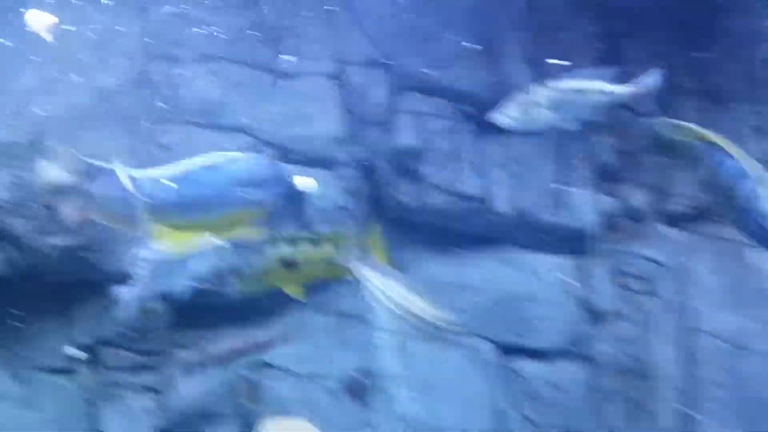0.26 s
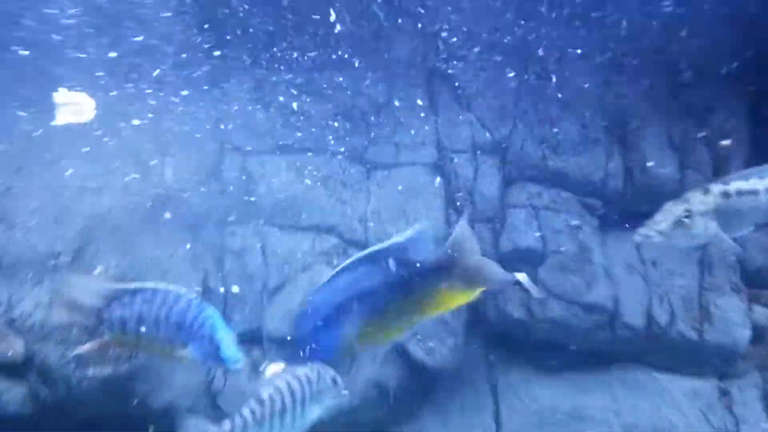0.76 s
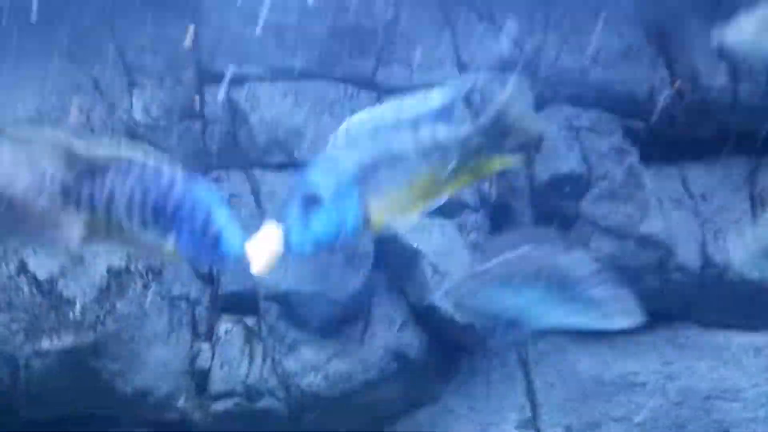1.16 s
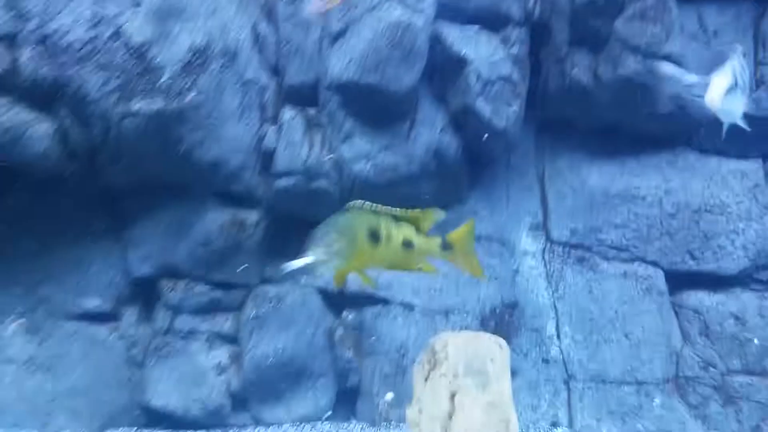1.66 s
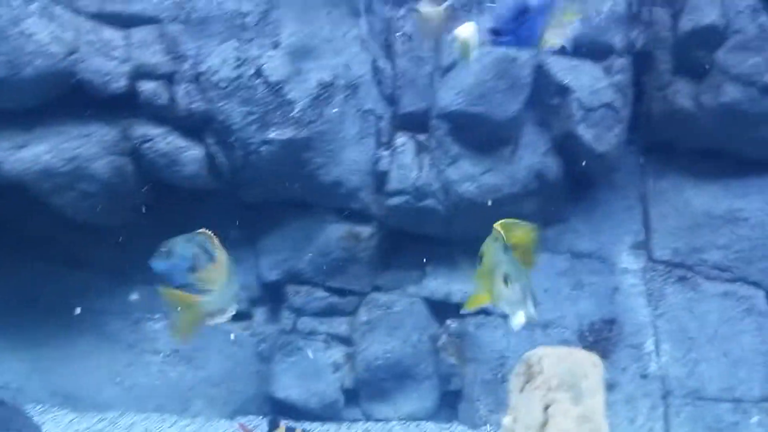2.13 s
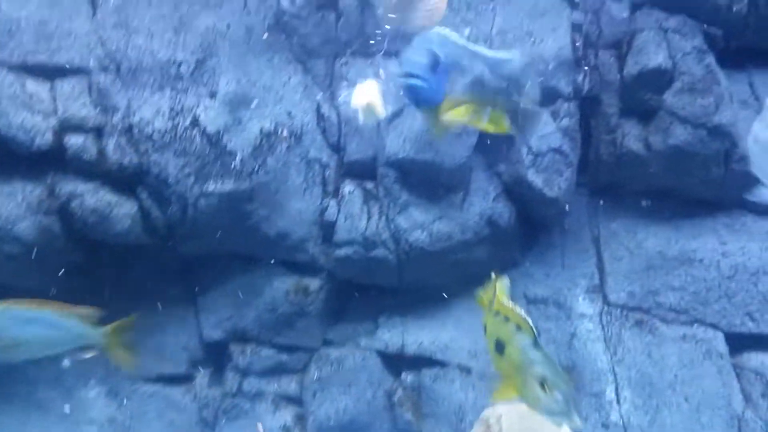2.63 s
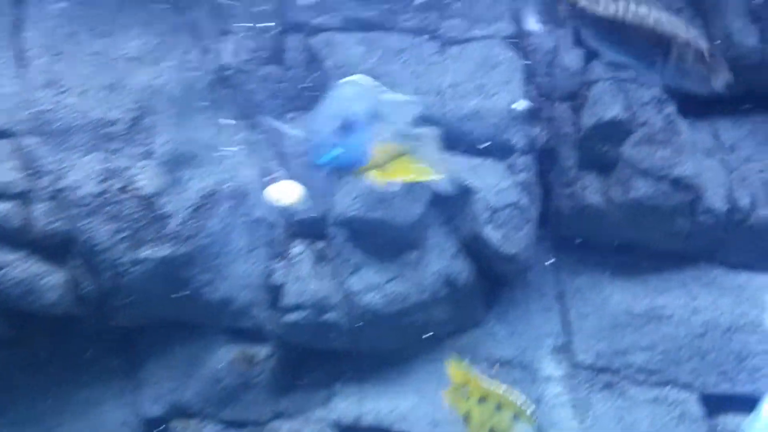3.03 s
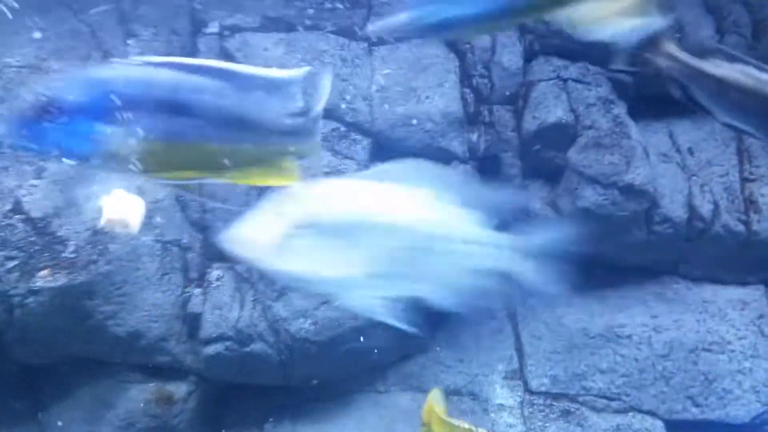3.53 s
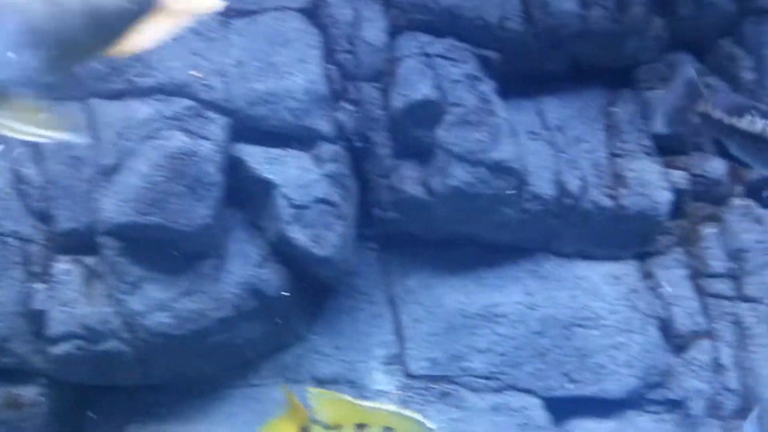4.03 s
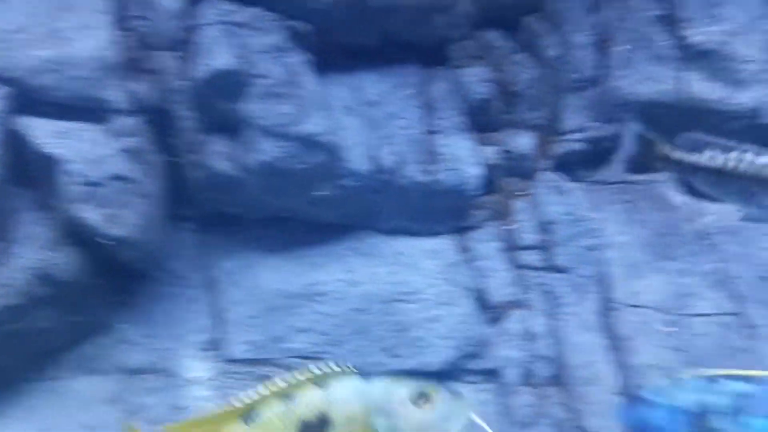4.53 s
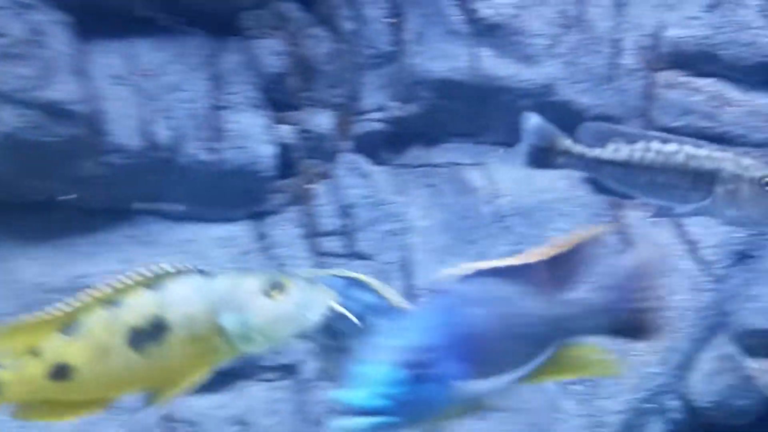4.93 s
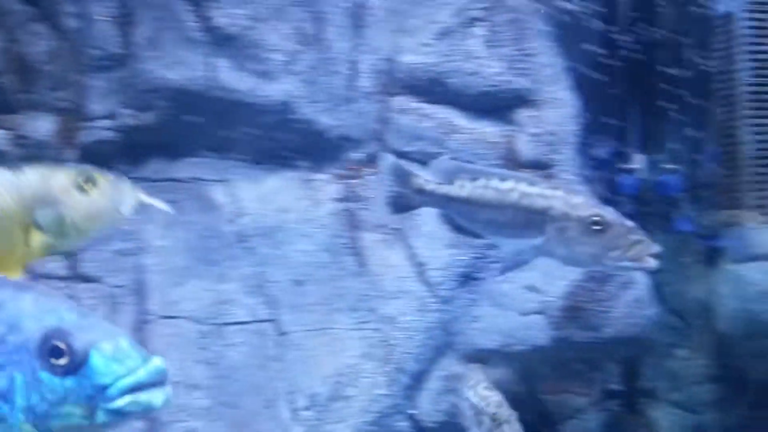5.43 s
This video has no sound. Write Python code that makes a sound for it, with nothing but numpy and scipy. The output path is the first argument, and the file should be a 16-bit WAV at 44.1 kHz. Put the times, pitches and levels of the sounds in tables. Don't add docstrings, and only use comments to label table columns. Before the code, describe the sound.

Aquarium pumps hum steadily under rushing, trickling water while fingers scuff the handheld device, with a sharp snap, soft thuds and one hard knock.

```python
import sys
import numpy as np
from scipy import signal
from scipy.fft import rfft, irfft, next_fast_len
from scipy.io import wavfile
from scipy.ndimage import uniform_filter1d, map_coordinates

SR = 44100
rng = np.random.default_rng(int(sys.argv[2]) if len(sys.argv) > 2 else 0)


def volts_from_db(level):
    exponent = np.asarray(level, float) / 20
    return 10 ** exponent


def master(y):
    cut = np.clip(np.atleast_2d(y).T, -1, 1)
    pcm = np.round(cut * 32767)
    wavfile.write(sys.argv[1], SR, pcm.astype(np.int16))


N = 250488

MAINS_HZ = 60
TOP_HZ = 15760
USUAL_HUM_DB = -55

# time_s, pump_db, trickle_db
DRIFT = [(0.0, -57, -73.5), (0.12, -55.5, -74), (0.25, -54, -71), (0.47, -52.5, -65.5), (0.84, -54.5, -68),
         (1.09, -53.5, -67), (1.5, -56.5, -71), (1.72, -56, -71.5), (2.01, -55.5, -67.5),
         (2.42, -59, -74.5), (3.31, -56.5, -73.5), (3.48, -55, -70), (4.3, -56, -70), (4.67, -52, -68.5),
         (5.24, -53.5, -69), (5.68, -55.5, -71.5)]
# time_s, left_right_db
TANK_PAN = [(0, -2), (.9, -2), (4.4, -2.5), (5.2, -1)]
STRONG = [4, 5, 8]
# under_hum_db, gain_db_per_s, depth_db, crest_s, spacing_s
STANDING = [
    (-13, 1.47, 0, 1.1, 2.6),
    (-7, -0.52, 1, 0.041, 2.5),
    (-13.5, 0.35, 3.5, 2.27, 3.36),
]
# mains_multiple, under_hum_db
BUZZ = [(3, -26.5), (6, -18.5), (7, -44), (9, -17.5), (10, -17), (11, -30), (12, -35.5), (14, -17),
        (15, -16.5), (17, -16), (18, -18.5), (19, -19.5)]
# pitch_hz, under_hum_db, gain_db_per_s
THROB = [
    (48.4, -22, 2),
    (59.9, -10, -5.5),
    (99, -21, 1.1),
]
# freq_hz, density_db_per_hz
RUSH = [(15, -40), (50, -13.5), (90, -12), (200, -4), (330, -3), (420, -9), (750, -9.5), (900, -9.5),
        (1100, -10.5), (1250, -17), (1450, -26), (2000, -33), (4000, -45.5), (6000, -59.5)]
# freq_hz, density_db_per_hz
CABINET = [(15, -32), (30, -3.5), (48, 5), (62, 5.5), (90, 4), (140, -41)]
# freq_hz, density_db_per_hz
TRICKLE = [(900, -17), (1500, -10.5), (1800, -4), (2100, 0), (2400, -8.5), (2700, -12), (3000, -17.5),
           (3600, -22), (4400, -26), (5500, -35), (9000, -50)]
# freq_hz, left_right_likeness (cosine)
ALIKE = [(60, 0.39), (290, 0.84), (640, 0.95), (1400, 0.17), (2200, 0), (5000, 0)]
# time_s, effort_db
GRIP = [(0.0, -81.5), (0.25, -83.5), (0.44, -78), (0.74, -79.5), (0.98, -80.5), (1.33, -82.5), (1.8, -80.5),
        (1.99, -77.5), (2.23, -83), (2.42, -83), (2.7, -94), (3.34, -92.5), (4.43, -81), (4.59, -78),
        (4.87, -81.5), (5.68, -82)]
# freq_hz, density_db_per_hz
CLOTH = [(1500, -31), (3500, 13), (5500, -4.5), (7000, -1), (9500, -11), (12000, -4), (14000, -3),
         (15700, -13)]
# start_s, level_db, attack_s, hold_s, release_s
SLIDE = [
    (0.203, -79, 0.013, 0.05, .03),
    (.225, -56.5, 0.066, 0.029, .045),
    (0.332, -78.5, 0.028, 0.053, .05),
]
# freq_hz, density_db_per_hz
SKIN = [(5000, -44), (6500, -16), (7800, 3.5), (11000, -5), (12500, -11), (14000, -16), (15500, -16)]
# start_s, level_db, left_right_db, t60_s, centre_hz
SCUFFS = [(.453, -56, -0.5, 0.32, 8700), (.955, -77, -2, 0.44, 10000), (1.753, -89, 6, .1, 6500),
          (.452, -56, -6, 0.17, 3000), (1.927, -76, 1, 0.59, 7500), (2.06, -78, 3, 0.65, 7000),
          (2.947, -82, 0, 0.093, 7000), (3.04, -81, 1, .069, 7000), (3.28, -84, -6, .076, 5000),
          (3.697, -75, -4, 0.12, 5500), (3.938, -71.5, -1, 0.3, 4300), (4.435, -76, -3, 0.36, 7000),
          (4.445, -67.5, 1, 0.35, 3960), (4.475, -69.5, 1, .3, 6260), (4.51, -70.5, -6, 0.47, 5000),
          (4.96, -85, -6, .13, 7000)]
# start_s, level_db, left_right_db, t60_s, centre_hz
SQUEAKS = [
    (1.871, -78.5, 2, 0.35, 7000),
    (1.94, -78, 4, 0.45, 7200),
    (3.84, -81, -10, .026, 8700),
    (4.359, -83.5, 4, 0.066, 6800),
    (4.548, -66.5, -17, .13, 8000),
    (4.758, -78.5, -6, 0.21, 8600),
    (5.283, -73.5, 3, .082, 7300),
    (5.57, -86, -3, .12, 8500),
]
# start_s, level_db, left_right_db, t60_s, centre_hz
THUDS = [
    (1.335, -49, 0, .12, 130),
    (1.356, -48.5, 0, .09, 550),
    (1.428, -51, 0, .07, 350),
]
# pitch_hz, level_db, t60_s
SNAP = [(6800, -45, .008), (8350, -43, .009), (10600, -38, .007), (1980, -45, .008), (2600, -48, .008),
        (1050, -47, .012), (3600, -51, .007), (13500, -50, .005)]
# time_s, level_db, left_right_db, lowest_hz, highest_hz
KNOCKS = [
    (2.0218, -31.5, 16, 302, 5000),
]
# freq_hz, width_hz, level_db
CASE = [(704, 120, 4), (1280, 310, -14), (2130, 220, 8.5), (3500, 270, -4.5), (5000, 2400, 0),
        (10800, 3000, -20.5)]
# time_s, peak_db, left_right_db
CLICKS = [
    (1.7525, -47, 14),
    (2.1715, -61, 14),
    (2.58, -68, 0),
    (3.755, -64, -10),
    (4.5095, -46, -2),
]
# time_s, peak_db, left_right_db, rise_s, fall_s
BUMPS = [
    (1.354, -31.5, -6, 0.0015, 0.01),
    (1.672, -26, 18, 0.0055, 0.016),
    (1.751, -38, 14, 0.0038, 0.0049),
    (2.0215, -8, 36, 0.00058, 0.0025),
]
PUSH = [
    -1,
    -1,
    -1,
    1,
]
# freq_hz, width_hz, level_db
PORTS = [
    [(7000, 536, 14.5), (7750, 220, -3), (11400, 3700, -9.5), (16400, 550, -19)],
    [(7200, 380, -7), (8190, 510, 6.5), (11240, 1050, 5), (16300, 900, 14)],
]


def unit(x):
    return x / np.sqrt(np.mean(x ** 2) + 1e-20)


def along(points, hz):
    f, v = np.transpose(points)
    return np.interp(np.log(hz + 1), np.log(f + 1), v)


def curves(rows):
    s, *cols = np.transpose(rows)
    return [np.interp(np.arange(N) / SR, s, c) for c in cols]


def wobble(rate_hz):
    knots = rng.standard_normal(int(N * rate_hz / SR) + 4)
    return map_coordinates(knots, [np.arange(N) * rate_hz / SR])


def filtered(x, response):
    m = next_fast_len(N + SR // 2)
    return irfft(rfft(x, m) * response(np.fft.rfftfreq(m, 1 / SR)), m)[..., :N]


def sides(pan_db):
    left = 1 / (1 + volts_from_db(-np.asarray(pan_db)))
    return 2 * np.array([left, 1 - left])


def noise(spectrum, patchy_db):
    z = signal.stft(rng.standard_normal((2, N)), nperseg=512)[2]
    field = uniform_filter1d(rng.standard_normal(z.shape[1:]), 4, 0)
    field = uniform_filter1d(field, 10, 1)
    pair = signal.istft(z * volts_from_db(patchy_db * unit(field)), nperseg=512)[1][:, :N]

    def mid_side(hz):
        turn = np.arccos(np.clip(along(ALIKE, hz), -1, 1)) / 2
        return volts_from_db(along(spectrum, hz)) * (hz < TOP_HZ) * np.array([np.cos(turn), np.sin(turn)])

    mid, side = filtered(pair, mid_side)
    return unit(np.array([mid + side, mid - side]))


def resonances(f, modes):
    return sum(volts_from_db(db) * 1j * f * w / (c * c - f * f + 1j * f * w) for c, w, db in modes)


def pump_hum_db():
    return curves(DRIFT)[0] + 3.2


def pumps():
    t = np.arange(N) / SR
    hum_db = pump_hum_db()

    def tone(multiple, db, waver):
        level = volts_from_db(db + 3.5 * waver * wobble(3.95))
        phase = waver * wobble(5) + rng.uniform(0, 2 * np.pi)
        return level * np.sin(2 * np.pi * MAINS_HZ * multiple * t + phase)

    out = tone(2, hum_db, 0.18)
    for multiple, (db, gain, depth, crest_s, spacing_s) in zip(STRONG, STANDING):
        standing_db = depth * np.cos(2 * np.pi * (t - crest_s) / spacing_s)
        out += tone(multiple, hum_db + db + gain * t + standing_db, 0.31)
    for multiple, db in BUZZ:
        out += tone(multiple, hum_db + db - 1.5, 1.05)
    return out


def throb():
    t = np.arange(N) / SR
    hum_db = pump_hum_db()
    out = np.zeros(N)
    for hz, db, gain in THROB:
        level = volts_from_db(hum_db + db + gain * t + 2.0 * wobble(2.5))
        out += level * np.sin(2 * np.pi * hz * t + 0.6 * wobble(4))
    return out


def rush():
    level_db = -56 + 0.44 * (curves(DRIFT)[0] - USUAL_HUM_DB)
    stroke = 1 + 0.29 * np.sin(2 * np.pi * 2 * MAINS_HZ * np.arange(N) / SR)
    return volts_from_db(level_db + wobble(7)) * stroke * noise(RUSH, patchy_db=1.0)


def rumble():
    level_db = -68 + curves(DRIFT)[0] - USUAL_HUM_DB
    return volts_from_db(level_db) * noise(CABINET, patchy_db=2.6)


def bubbles(count, hz, cycles):
    draw = rng.random((count, 3))
    pitch_hz = hz * volts_from_db(.3 * rng.standard_normal((count, 1)))
    u = np.arange(700) / SR * pitch_hz
    grain = np.sin(2 * np.pi * (u + 0.00075 * u * u)) * np.exp(-3 * u / cycles) * (1 - np.exp(-u))
    grain *= volts_from_db(-2 * np.log(draw[:, :1]))
    at = (draw[:, 1:2] * N).astype(int) + np.arange(700)
    share = [draw[:, 2:3], 1 - draw[:, 2:3]]
    return unit(np.array([np.bincount(at.ravel(), (grain * s).ravel())[:N] for s in share]))


def trickle():
    splash = volts_from_db(2.5) * noise(TRICKLE, patchy_db=1.5)
    ringing = volts_from_db(-1.6) * bubbles(count=4000, hz=2027, cycles=18)
    return volts_from_db(curves(DRIFT)[1]) * (splash + ringing)


def tank():
    sources = pumps() + throb() + rush() + rumble() + trickle()
    panned = sources * sides(curves(TANK_PAN)[0])
    lag_s = 0.00024
    return filtered(panned, lambda f: np.array([np.exp(-2j * np.pi * f * lag_s), np.ones_like(f)]))


def cloth():
    level_db = -87.5 + 2.2 * (curves(GRIP)[0] + 84)
    return volts_from_db(level_db + 1.5 * wobble(60)) * sides([-2.5]) * noise(CLOTH, patchy_db=-0.5)


def slide():
    t = np.arange(N) / SR
    fade_db = 33
    stroke = np.zeros(N)
    for s, db, attack_s, hold_s, release_s in SLIDE:
        knots_s = np.cumsum([s - .01, .01, attack_s, hold_s, release_s, .01])
        stroke += volts_from_db(db + np.interp(t, knots_s, [-90, -fade_db, 0, 0, -fade_db, -90]))
    return stroke * volts_from_db(-9.5 + 1.5 * wobble(121.5)) * sides([-32]) * noise(SKIN, patchy_db=-2.5)


def scuffs():
    out, t = np.zeros((2, N + SR)), np.arange(SR // 2) / SR
    hz = np.fft.rfftfreq(len(t), 1 / SR)
    grain = volts_from_db(1.5 * wobble(200))
    for rows, width_oct in [(SCUFFS, 0.7), (SQUEAKS, .22), (THUDS, 0.59)]:
        for s, db, pan_db, t60_s, centre_hz in rows:
            shape = (1 - np.exp(-t / (0.0067 * t60_s))) * volts_from_db(-60 * t / t60_s)
            octaves = np.log2(hz / centre_hz + 1e-6)
            band = np.exp(-.5 * (octaves / width_oct) ** 2) * (hz < TOP_HZ)
            grit = unit(irfft(rfft(rng.standard_normal((2, len(t)))) * band, len(t)))
            out[:, round(s * SR):][:, :len(t)] += volts_from_db(db) * sides([pan_db]) * shape * grit
    return out[:, :N] * grain


def snap():
    start_s, rise_s, gain_db = .4486, .001, 13
    t = np.clip(np.arange(N) / SR - start_s, 0, None)
    ring = sum(volts_from_db(db + gain_db - 60 * t / t60_s) * np.sin(2 * np.pi * hz * t) for hz, db, t60_s in SNAP)
    return ring * (1 - np.exp(-t / rise_s)) ** 2 * sides([-1.5])


def knocks():
    def response(f):
        blow = 0
        for s, db, pan_db, low_hz, high_hz in KNOCKS:
            contact = (f / (f - 1j * low_hz) / (1 + 1j * f / high_hz)) ** 2 * 8000 / high_hz
            delay = np.exp(-2j * np.pi * f * s)
            blow = blow + volts_from_db(db + 14.5) * sides([pan_db]) * delay * contact
        return blow * resonances(f, CASE)

    return filtered(np.arange(N) == 0, response)


def clicks():
    out = np.zeros((2, N))
    for s, db, pan_db in CLICKS:
        out[:, round(s * SR)] = volts_from_db(db) * sides(pan_db)
    return filtered(out, lambda f: (f / (f - 4000j)) ** 2)


def bumps():
    t = np.arange(N) / SR
    puff = np.zeros((2, N))
    for sign, (s, db, pan_db, rise_s, fall_s) in zip(PUSH, BUMPS):
        ramp = np.interp(t, [s, s + rise_s, s + rise_s + fall_s], [0, 1, 0])
        puff += sign * volts_from_db(db) * sides([pan_db]) / 2 * np.sin(np.pi / 2 * ramp) ** 2
    cut_hz, damping = 88, 1.15
    return filtered(puff, lambda f: -f * f / (cut_hz ** 2 - f * f + 1j * damping * f * cut_hz))


def hiss():
    level_db = -90.0 + 0.37 * (curves(DRIFT)[0] - USUAL_HUM_DB)
    return volts_from_db(level_db) * noise([(100, 0), (6000, 0), (9300, -1), (15000, 0)], patchy_db=.5)


def scene():
    return tank() + cloth() + slide() + scuffs() + snap() + knocks() + clicks() + bumps()


def band_limit(x):
    return signal.sosfilt(signal.butter(12, 16430, fs=SR, output="sos"), x)


def record(dry):
    def ports(f):
        return np.array([(1 + resonances(f, modes)) * (f < 16200) for modes in PORTS])

    mix = filtered(dry, ports) + hiss() - .0004
    return band_limit(mix)


dry = scene()
out = record(dry)
master(out)
```